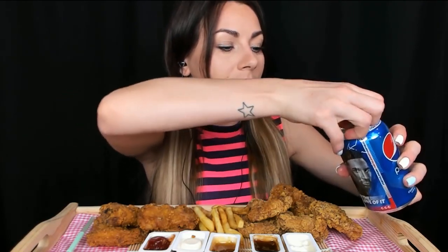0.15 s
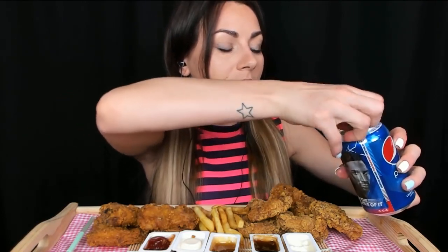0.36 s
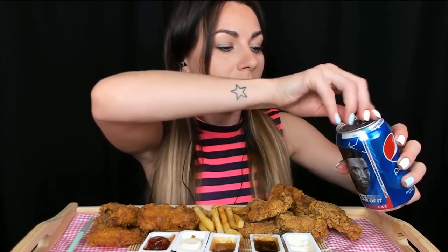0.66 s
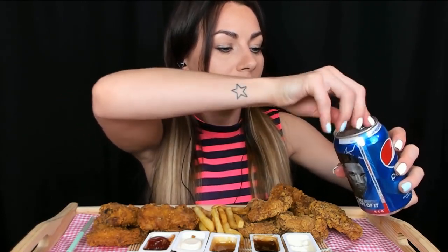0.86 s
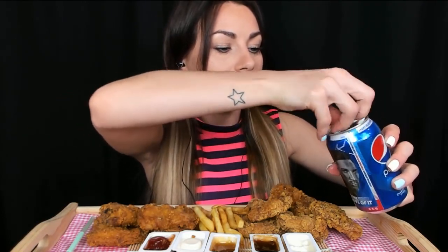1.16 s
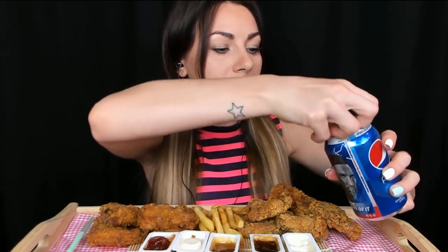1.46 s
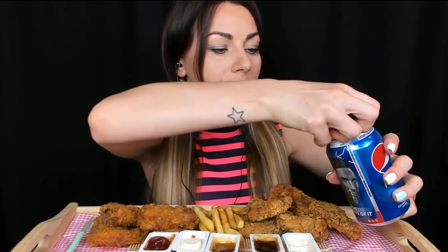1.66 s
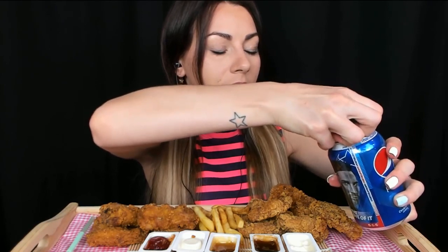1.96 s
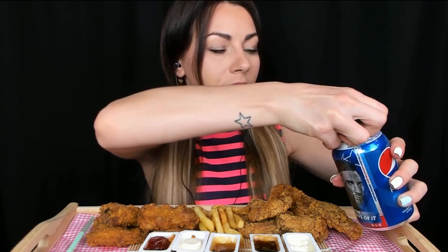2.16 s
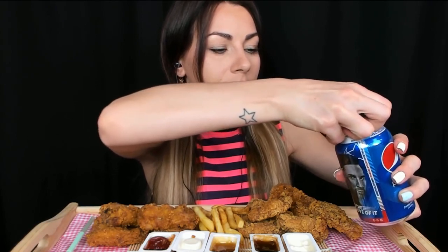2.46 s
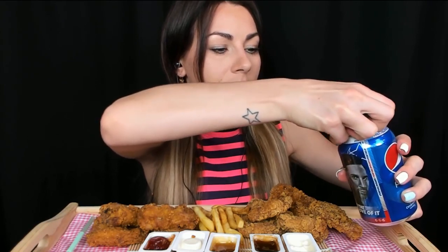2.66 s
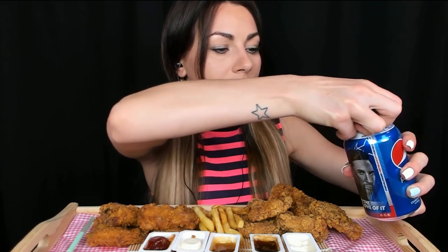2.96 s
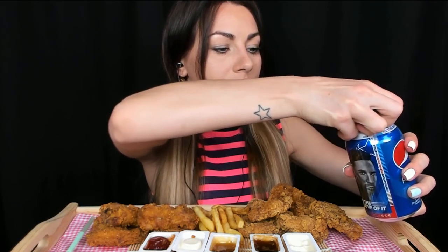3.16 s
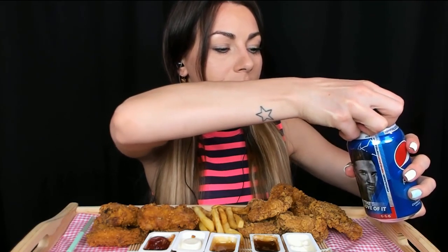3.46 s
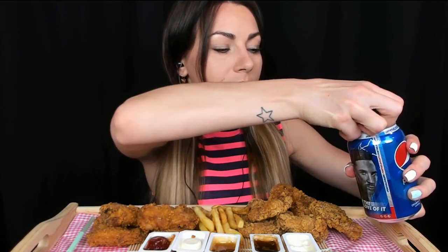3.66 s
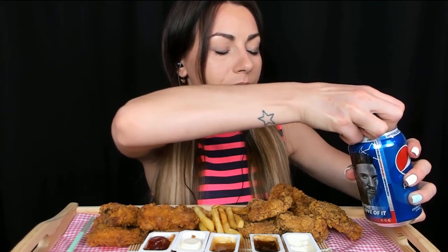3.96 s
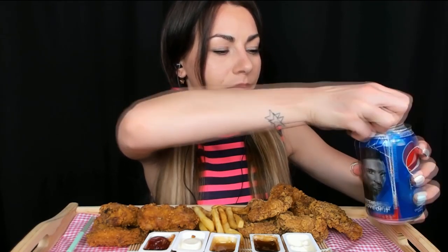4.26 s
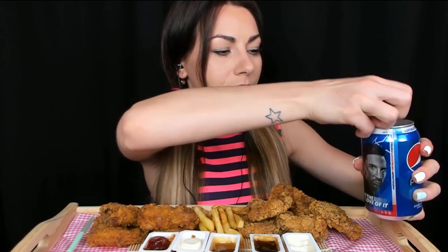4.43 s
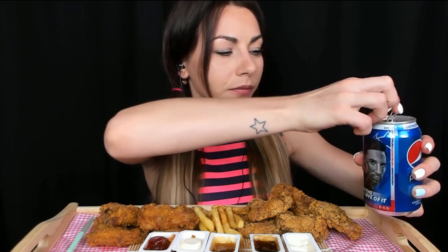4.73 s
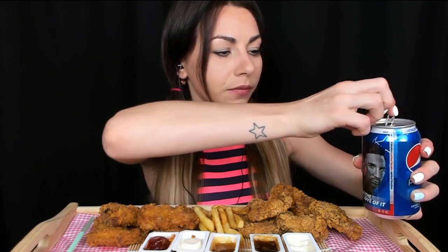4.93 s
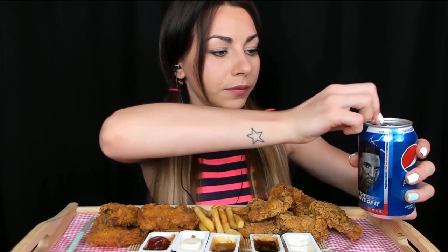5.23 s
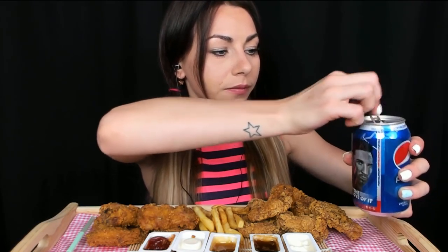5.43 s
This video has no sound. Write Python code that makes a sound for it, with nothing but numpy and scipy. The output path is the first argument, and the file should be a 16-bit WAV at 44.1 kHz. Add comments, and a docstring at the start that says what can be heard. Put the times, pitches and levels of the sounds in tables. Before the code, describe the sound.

A drink can is opened close to the microphones, slightly left of centre. Irregular nail clicks and scratches come first, then fine stick-slip creaks of the tab, then an abrupt crack and spray of escaping gas that dies fast. Near quiet follows, until a burst of crisp tearing snaps, delicate crackling bubbles and hollow tinny pops from the gripped can. Small, quiet room, little echo.

```python
"""Opening a soda can

A can is opened close to a stereo microphone in a quiet small room with a faint deep throb.
Nails tap and scrape the lid, the ring-pull creaks in stick-slip runs, the seal cracks and gas jets out.
Later the score line tears, the drink fizzes as clouds of tiny clicks and the thin wall pops.
Metal is struck noise plus decaying modes; gas is coloured noise shaped by its flow."""
import sys
import numpy as np
from scipy import signal
from scipy.fft import rfft, irfft, next_fast_len
from scipy.io import wavfile
from scipy.ndimage import uniform_filter1d

SR = 44100
rng = np.random.default_rng(int(sys.argv[2]) if len(sys.argv) > 2 else 0)


def inscribe(sig):
    """Save sig as 16-bit PCM at rate SR to the path in sys.argv[1].

    A 1-D sig is mono; a 2-D sig holds one channel per row.
    Samples are clipped to [-1, 1] before scaling.
    """
    pcm = np.round(np.clip(np.atleast_2d(sig).T, -1, 1) * 32767)
    wavfile.write(sys.argv[1], SR, pcm.astype(np.int16))


N = 246519
TIME = np.arange(N) / SR


def from_db(db):
    """Decibels to gain."""
    return 10 ** (np.asarray(db) / 20)


def rms_one(x):
    """Scale to unit power."""
    return x / np.sqrt(np.mean(x ** 2) + 1e-20)


def in_time(rows):
    """One curve per column, joined by straight lines."""
    s, *columns = np.transpose(rows)
    return [np.interp(TIME, s, c) for c in columns]


def at_hz(points, hz):
    """Read a table on a log-frequency axis."""
    known, values = np.transpose(points)
    return np.interp(np.log(np.maximum(hz, 1)), np.log(known), values)


def pan(left_db):
    """Channel gains for a source that is left_db louder on the left."""
    return from_db(np.array([[left_db], [-left_db]]) / 2)


def add(out, s, sound):
    """Mix a sound in at a time."""
    start = int(round(s * SR))
    out[:, start:start + sound.shape[1]] += sound[:, :N - start]


# even balance between the microphones: [f/Hz, left minus right/dB]
CENTRED = [(100, 0), (10000, 0)]


def coloured(pair, spectrum, likeness, sides=CENTRED):
    """Blend two unrelated signals into stereo of given spectrum, left-right likeness and balance; rms 1."""
    length = pair.shape[1]
    size = next_fast_len(length)
    hz = np.fft.rfftfreq(size, 1 / SR)
    left_right = np.array([[1], [-1]])
    mid, side = rfft(pair, size) * from_db(at_hz(spectrum, hz))
    alike = np.clip(at_hz(likeness, hz), -1, 1)
    both = np.sqrt(1 + alike) * mid + np.sqrt(1 - alike) * side * left_right
    balance = from_db(at_hz(sides, hz) * left_right / 2)
    return rms_one(irfft(both * balance, size)[:, :length])


# left-right likeness of the can's metal: [f/Hz, likeness 0-1]
CAN_LIKENESS = [(300, .7), (1800, 0.84), (4500, 0.22), (9000, 0.22), (16000, 0.252)]


def noise(spectrum, likeness=CAN_LIKENESS, size=N, sides=CENTRED):
    """Steady stereo noise; rms 1."""
    return coloured(rng.standard_normal((2, size)), spectrum, likeness, sides)


def flutter(per_s, depth_db):
    """A gain that wanders at random, per_s turns a second."""
    knots = rng.standard_normal(N)
    return from_db(depth_db * np.interp(TIME * per_s, np.arange(N), knots))


def grains(per_s, spread_db):
    """Two trains of random tiny clicks, most weak and a few strong."""
    strength = np.minimum(rng.exponential(1, (2, N)), 4)
    sizes = from_db(spread_db * strength) * rng.choice([-1, 1], (2, N))
    return sizes * (rng.random((2, N)) < per_s / SR)


def swells(rows, attack_s, release_s):
    """Gain that rises to each row's level, holds and falls; attack and release each span 60 dB."""
    levels = []
    for s, hold_s, level_db in rows:
        before = np.maximum(s - TIME, 0) / attack_s
        after = np.maximum(TIME - s - hold_s, 0) / release_s
        levels.append(level_db - 60 * (before + after))
    return from_db(np.maximum(np.max(levels, axis=0), -200))


def dying(s, level_db, t60):
    """A sudden start and an exponential fall."""
    return (TIME > s) * from_db(level_db - 60 * np.maximum(TIME - s, 0) / t60)


def ringing(modes, t, vary_db, port_spread):
    """Decaying modes; each blow and each microphone finds them with other strengths and phases."""
    hz, level_db, t60 = np.transpose(modes)[:, :, None]
    strength = from_db(level_db + vary_db * rng.standard_normal((2, len(modes), 1)))
    shared_phase = rng.uniform(0, 2 * np.pi, (len(modes), 1))
    phase = shared_phase + port_spread * rng.standard_normal((2, len(modes), 1))
    return np.sum(strength * from_db(-60 * t / t60) * np.sin(2 * np.pi * hz * t + phase), axis=1)


def blows(rows, modes, colour, crack_t60, ring_db, tail_db, tail_t60, rise_s):
    """Each blow is a short crack, the main modes, and a wash of the thin shell's countless small modes."""
    out = np.zeros((2, N))
    t = np.arange(SR // 5) / SR
    treble = signal.butter(1, 5000, "high", fs=SR, output="sos")
    for s, onset_db, treble_db in rows:
        decay = from_db(-60 * t / crack_t60) + from_db(tail_db - 60 * t / tail_t60)
        shell = noise(colour, size=len(t)) * decay
        ring = from_db(ring_db) * ringing(modes, t, vary_db=5.5, port_spread=0.452)
        blow = (shell + ring) * (1 - np.exp(-t / rise_s))
        blow = blow + (from_db(treble_db) - 1) * signal.sosfilt(treble, blow)
        onset_rms = np.sqrt(np.mean(blow[:, :SR // 400] ** 2))  # over the first 2.5 ms
        add(out, s, from_db(onset_db) * blow / onset_rms)
    return out


# balance of scraped metal between the microphones: [f/Hz, left minus right/dB]
LID_SIDES = [(500, 1.5), (2000, 2), (5000, 4.5), (10000, 3)]


def scraping(colour, modes, per_s, ring_db):
    """Dense little slips, heard directly and through the modes of the metal; rms 1."""
    slips = coloured(grains(per_s, spread_db=3.0), colour, CAN_LIKENESS, LID_SIDES)
    metal = ringing(modes, np.arange(SR // 10) / SR, vary_db=4.0, port_spread=0.47)
    rung = rms_one(signal.fftconvolve(slips, metal, axes=1)[:, :N])
    return rms_one(slips + from_db(ring_db) * rung)


def through_can(x, ring_db, t60):
    """Sound bounces about inside the can, whose many close air modes ripple the spectrum; rms 1."""
    t = np.arange(SR // 12) / SR
    bounces = rng.standard_normal((1, len(t))) * from_db(-60 * t / t60)
    bounces = rms_one(bounces) / np.sqrt(len(t))
    return rms_one(x + from_db(ring_db) * signal.fftconvolve(x, bounces, axes=1)[:, :N])


# room tone spectrum, shape only: [f/Hz, level/dB per Hz]
ROOM_TONE_COLOUR = [(12, -34.5), (20, -3.5), (70, -12), (123, -17.5), (216, -9.5), (255, -16.5), (319, -16),
                    (367, -17.5), (574, -22.5), (1760, -26.5), (2200, -28.5), (2820, -28), (4300, -37),
                    (14300, -43), (16000, -44.5)]
# left-right likeness of the room tone: [f/Hz, likeness 0-1]
TONE_LIKENESS = [(60, 0), (150, 0.7), (380, 0.25), (950, 0.5), (2380, 0.34), (5980, 0.34), (15000, 1)]
# trains of deep pulses: [first t/s, count, height before the low-pass]
THROBS = [(0.267, 10, -0.00327), (4.618, 3, 0.0029)]
ROOM_TONE_DB, THROB_PERIOD_S = -60, .4257


def background(throb_s, sag_s, sag):
    """Room tone, and an evenly paced deep throb of alternating sign; each pulse sags back to rest."""
    out = from_db(ROOM_TONE_DB) * noise(ROOM_TONE_COLOUR, TONE_LIKENESS)
    t = np.arange(SR // 2) / SR
    shape = np.where(t < throb_s, 1, sag * np.exp(-t / sag_s))
    pulse = signal.sosfilt(signal.butter(2, 45, fs=SR, output="sos"), shape)
    for s, count, height in THROBS:
        for k in range(round(count)):
            add(out, s + k * THROB_PERIOD_S, (-1) ** k * height * pulse[None])
    return out


# nail taps on the lid: [t/s, onset level/dB, treble lift/dB]
NAIL_TAPS = [(0.39, -48, 10), (0.3978, -67, 23), (0.405, -44.5, -6), (0.4914, -54, -3), (0.5357, -56, -17),
             (0.6779, -33, 5), (0.7087, -43, -8), (0.8024, -41, 6), (0.82, -51, -13), (0.8616, -40, -2),
             (0.9926, -57, -4), (1.0392, -51.5, -15), (1.1837, -57, -4)]
# tap spectrum, shape only: [f/Hz, level/dB per Hz]
TAP_COLOUR = [(530, -51.5), (900, -15), (1950, -6), (3860, -7.5), (5100, -5), (6800, -9.5), (8050, -7),
              (10200, -14), (12600, -15), (16000, -21)]
# modes of the lid, tight under pressure: [f/Hz, level/dB, t60/s]
TIGHT_LID = [(1426, -12.5, 0.049), (2026, 3, 0.037), (2560, -1, 0.04), (2872, -12.5, 0.066),
             (3010, -17, .04), (4253, -9.5, .035), (4874, -0.5, 0.025), (5150, -5.5, 0.0252),
             (5755, 1, 0.027), (7500, -16, .04), (7790, -11, .04), (8100, -8.5, 0.031), (8880, -11.5, .045),
             (9730, -11.5, .03), (12600, -10, .03)]
# nails sliding among the taps: [t/s, hold/s, level/dB]
NAIL_SLIDES = [(0.389, 0.012, -56), (0.42, 0.091, -65), (0.533, .01, -60), (0.693, 0.016, -52),
               (0.785, .04, -58.5), (0.993, 0.025, -60.5), (1.25, .025, -70.5)]
# slide spectrum, shape only: [f/Hz, level/dB per Hz]
SLIDE_COLOUR = [(900, -21), (1450, -8.5), (2050, -7), (2400, -14), (2900, -5), (3900, -7.5), (5000, -8),
                (6000, -3), (7000, -12), (8500, -8), (10500, -11.5), (13000, -12), (16000, -21)]
SLIDE_ATTACK_S, SLIDE_RELEASE_S = 0.089, 0.12


def nails():
    """Nails tap the tight lid as single blows and scrape over it as dense slips."""
    taps = blows(NAIL_TAPS, TIGHT_LID, TAP_COLOUR, crack_t60=0.024, ring_db=-1.0,
                 tail_db=-12.5, tail_t60=0.08, rise_s=0.00032)
    slide_gain = swells(NAIL_SLIDES, SLIDE_ATTACK_S, SLIDE_RELEASE_S)
    scrape = slide_gain * scraping(SLIDE_COLOUR, TIGHT_LID, per_s=2500, ring_db=-14)
    return taps * pan(left_db=4.0) + scrape


# hollow between fingers and lid, ringing as they move: [t/s, f/Hz, level/dB]
HOLLOW_GLIDE = [(0.75, 1836, -88), (0.785, 1820, -69), (0.81, 1850, -69), (0.83, 1907, -55),
                (0.86, 1990, -71), (0.89, 2030, -73), (0.92, 2030, -93)]
# modes of that hollow: [multiple of its pitch, level/dB]
HOLLOW_MODES = [(1, 4.5), (1.39, -10)]


def finger_hollow(width_hz):
    """Scraping excites two modes of the air under the fingers, whose pitch rises as they open."""
    hz, level_db = in_time(HOLLOW_GLIDE)
    phase = 2 * np.pi * np.cumsum(hz) / SR
    lowpass = signal.butter(2, width_hz, fs=SR, output="sos")
    out = 0
    for ratio, mode_db in HOLLOW_MODES:
        # slow noise on both quadratures makes a narrow band around the gliding pitch
        cos_gain, sin_gain = signal.sosfilt(lowpass, rng.standard_normal((2, N)))
        band = cos_gain * np.cos(ratio * phase) + sin_gain * np.sin(ratio * phase)
        out = out + from_db(mode_db) * rms_one(band)
    return from_db(level_db) * out * pan(left_db=3.0)


# pulls on the tab, each a run of slips:
# [t/s, slip count, gap/s, first onset level/dB, growth/dB per slip, treble lift/dB, rasp level/dB]
TAB_PULLS = [(1.49, 6, 0.0088, -59, 2, -1, -63), (1.549, 4, 0.0092, -43.5, -2.5, 8, -66),
             (1.6108, 2, 0.024, -49.5, 2, -5, -77), (1.655, 6, 0.011, -48.5, -1.34, 2, -58),
             (1.7141, 5, 0.013, -52.5, 0, 1, -61), (1.7874, 2, 0.018, -55, -3, -5, -64.5),
             (1.8302, 2, .0255, -50.5, -4, 3, -78), (1.869, 2, .0145, -57, 2, -1, -71),
             (1.935, 5, .0109, -57.5, 1.34, 4, -65), (2.034, 3, 0.039, -60, -0.5, -5, -69.5)]
SLIP_JITTER = .025  # unevenness of the slips, as a share of their gap


def stick_slip():
    """Under each pull the tab slips at a nearly even pace, harder, softer or alike each time."""
    slips = []
    for s, count, gap_s, onset_db, growth_db, treble_db, _ in TAB_PULLS:
        for k in range(round(count)):
            slip_s = s + gap_s * (k + SLIP_JITTER * rng.standard_normal())
            slips.append((slip_s, onset_db + growth_db * k, treble_db))
    return slips


# modes of the ring-pull levering on its rivet: [f/Hz, level/dB, t60/s]
RING_PULL_MODES = [(1430, -5.5, 0.056), (1730, -7.5, .04), (2050, -6, .04), (2860, -1, 0.04),
                   (5100, -9.5, .009), (8400, 1.5, 0.011), (12050, -10, .008)]
# creak spectrum, shape only: [f/Hz, level/dB per Hz]
CREAK_COLOUR = [(650, -44.5), (1100, -12.5), (2060, -9), (2700, -7), (2920, -6.5), (3860, -16.5),
                (4940, -11), (6980, -15), (11800, -13), (16000, -26)]
RASP_ATTACK_S, RASP_RELEASE_S = .08, 0.11


def ring_pull():
    """The tab creaks in stick-slip and rasps on its rivet all through each pull."""
    creaks = blows(stick_slip(), RING_PULL_MODES, CREAK_COLOUR, crack_t60=0.011, ring_db=-11.5,
                   tail_db=-16.5, tail_t60=0.056, rise_s=.0001)
    pulls = [(s, count * gap_s, rasp_db) for s, count, gap_s, _, _, _, rasp_db in TAB_PULLS]
    rasp_gain = swells(pulls, RASP_ATTACK_S, RASP_RELEASE_S)
    rasp = rasp_gain * scraping(CREAK_COLOUR, RING_PULL_MODES, per_s=500, ring_db=-2)
    return creaks * pan(left_db=3.5) + rasp


# the seal cracking under pressure: [t/s, onset level/dB, treble lift/dB]
SEAL_CRACKS = [(2.1565, -26.5, 2.5), (2.1602, -8.5, -2)]
# seal spectrum, shape only: [f/Hz, level/dB per Hz]
SEAL_COLOUR = [(88, -47), (150, -15), (854, -13.5), (2310, -6), (4580, 0.5), (7180, -10.5), (8230, -5),
               (10200, -13), (11700, 0), (16000, -19)]


def seal_crack():
    """The seal gives way in two sharp blows that ring the tight lid."""
    return blows(SEAL_CRACKS, TIGHT_LID, SEAL_COLOUR, crack_t60=0.014, ring_db=-19,
                 tail_db=-25.5, tail_t60=.05, rise_s=0.00035)


# gas spurts as the slit opens and widens: [t/s, level/dB, attack/s, hold/s, t60 of sagging pressure/s]
SPURTS = [(2.158, -5.5, .008, 0.1266, 0.82), (2.29, -13.5, 0.0038, 0.079, 0.314)]
SPURT_RELEASE_S = 0.14  # t60 added once the pressure is spent


def gas_flow():
    """Each spurt opens quickly, sags with the pressure and dies away once that is spent."""
    flow = 0
    for s, level_db, attack_s, hold_s, sag_t60 in SPURTS:
        t = np.clip(TIME - s, 0, 1)
        fall = t / sag_t60 + np.maximum(t - hold_s, 0) / SPURT_RELEASE_S
        flow = flow + (1 - np.exp(-t / attack_s)) * from_db(level_db - 60 * fall)
    return flow


# spectra of jet, rush inside the can and low buffeting, shape only: [f/Hz, level/dB per Hz]
JET_COLOUR = [(6000, -38.5), (7200, -19), (7800, -3), (8400, 3), (9000, -3.5), (9900, -5.5), (11000, -2.5),
              (11900, -0.5), (12400, -3), (13100, -3.5), (13900, -8.5), (14700, -5.5), (16000, -13.5)]
RUSH_COLOUR = [(300, -22), (900, -12.5), (1400, -10), (1750, -9), (2100, -5.5), (2600, -4.5), (2950, -4),
               (3500, -2.5), (4400, -0.5), (5200, -1), (6300, -3), (6800, -8.5), (7400, -0.5),
               (9000, -26.5)]
BUFFET_COLOUR = [(20, -6), (45, 1.5), (90, -5), (200, -3.5), (500, -5), (1100, -10), (2000, -14.5),
                 (4000, -41.5)]
# left-right likeness of the escaping gas: [f/Hz, likeness 0-1]
GAS_LIKENESS = [(300, 0.3), (1800, 0.6), (3000, 0.6), (5000, 0.24), (8500, 0.5), (13000, 0.11)]
# balance of the gas between the microphones: [f/Hz, left minus right/dB]
GAS_SIDES = [(60, 3.75), (110, 4.9), (200, 5.5), (380, 5.3), (700, 6.9), (1290, 5.0), (2380, 1.0),
             (4400, 1.5), (8120, 6.4), (15000, 2.5)]
# the first of the gas blows over the microphones: [t/s, hold/s, level/dB]
GUST = [(2.161, .097, -37)]
RUSH_DB, RUSH_FOLLOWS = -11, 1.28  # level at unit flow, dB per dB of flow
BUFFET_DB = -45  # against the flow


def gas():
    """A sputtering bright jet leaves the slit, with a duller rush and buffeting beneath it."""
    flow = gas_flow()
    jet_noise = noise(JET_COLOUR, GAS_LIKENESS, sides=GAS_SIDES)
    jet = flow * through_can(jet_noise, ring_db=-7.0, t60=0.078)
    rush_noise = noise(RUSH_COLOUR, GAS_LIKENESS, sides=GAS_SIDES)
    rush_gain = from_db(RUSH_DB) * flow ** RUSH_FOLLOWS
    rush = rush_gain * through_can(rush_noise, ring_db=-2.5, t60=0.073)
    buffet_gain = from_db(BUFFET_DB) * flow + swells(GUST, attack_s=0.0066, release_s=0.033)
    buffet = buffet_gain * noise(BUFFET_COLOUR, GAS_LIKENESS, sides=GAS_SIDES)
    return flutter(per_s=330, depth_db=0.8) * (jet + rush + buffet)


# left-right likeness of the soft tails and the fizz: [f/Hz, likeness 0-1]
FIZZ_LIKENESS = [(60, 0.23), (150, 0.6), (380, 0.4), (950, 0.6), (2380, 0.7), (5980, 0.24), (15000, 0.73)]
# the hiss lingering in the room after the burst: [t/s, level/dB, t60/s]
HISS_TAIL = (2.34, -36.5, 0.5)
# a soft noise tail that starts abruptly after the tears and dies away: [t/s, level/dB, t60/s]
TEAR_TAIL = (4.198, -43.5, 0.46)
# their spectra, shape only: [f/Hz, level/dB per Hz]
HISS_TAIL_COLOUR = [(1470, -15.5), (2500, -7.5), (4110, -11), (4480, -3.5), (6110, -9), (8400, -1),
                    (13200, -12), (16000, -23)]
TEAR_TAIL_COLOUR = [(180, -50), (300, -26), (515, -9.5), (746, -20), (937, -7), (1010, -24), (1100, -11.5),
                    (2360, -5.5), (2920, 1), (9000, -27.5), (11700, -52), (19800, -120)]


def soft_tails():
    """Fading noise: the hiss lingers in the room after the burst, and a soft tail follows the tears."""
    hiss_tail = dying(*HISS_TAIL) * noise(HISS_TAIL_COLOUR, FIZZ_LIKENESS)
    tear_tail = dying(*TEAR_TAIL) * noise(TEAR_TAIL_COLOUR, FIZZ_LIKENESS) * pan(left_db=-0.5)
    return (hiss_tail + tear_tail) * flutter(per_s=250, depth_db=-0.8)


# the score line giving way: [t/s, onset level/dB, treble lift/dB]
TEARS = [(3.988, -61, -11.5), (4.0313, -26.5, 8), (4.0347, -25, 18), (4.0360, -24, 9.5),
         (4.0675, -27.5, -2), (4.0750, -27, 15), (4.1110, -29, 13), (4.1915, -50.5, -13)]
# modes of the lid, slack after venting: [f/Hz, level/dB, t60/s]
SLACK_LID = [(2530, 7, 0.018), (2810, -3, 0.017), (3240, -2.5, .018), (3720, 0, 0.024), (3850, -13, 0.083),
             (4570, -9, 0.028), (4945, -14, 0.23), (5130, -23, 0.2), (5350, -6, 0.057), (7160, -11, .03),
             (9030, -1, 0.011)]
# tear spectrum, shape only: [f/Hz, level/dB per Hz]
TEAR_COLOUR = [(180, -55), (300, -21), (713, -9.5), (1870, -11.5), (2480, -1), (3640, 1), (4300, -7),
               (5250, -5.5), (7820, -12), (9240, -6), (12100, -22), (14000, -15), (16000, -34)]


def score_tear():
    """The score line tears in jerks, each a blow on the slack lid."""
    tears = blows(TEARS, SLACK_LID, TEAR_COLOUR, crack_t60=0.0073, ring_db=-21.5,
                  tail_db=-27, tail_t60=0.14, rise_s=0.00087)
    return tears * pan(left_db=4.0)


# spectra of spray at the opening and bubbles inside, shape only: [f/Hz, level/dB per Hz]
SPRAY_COLOUR = [(1500, -29.5), (2500, -9), (3200, -0.5), (3600, -7), (4100, -1), (5600, -4.5), (7000, -5),
                (8600, 0.5), (10300, -6), (13200, -6.5), (14900, -6.5), (16000, -17.5)]
BUBBLE_COLOUR = [(350, -27), (500, -4.5), (700, -15), (950, 2.5), (1400, -10), (1900, -6), (2550, 2.5),
                 (3200, 0.5), (3600, -7), (4100, -1), (6200, -7), (7300, -16), (8650, -9), (16000, -32)]
# balance of the fizz between the microphones: [f/Hz, left minus right/dB]
FIZZ_SIDES = [(60, -0.5), (130, 1), (290, 9), (640, 8), (1410, 1), (3100, 1), (6820, 5.5), (15000, 5)]
# spray builds, then slowly settles: [t/s, hold/s, level/dB]
SPRAY_SWELL = [(4.52, 0.085, -57)]
# foam wells up inside the can as it is moved: [t/s, hold/s, level/dB before its flutter]
FOAM_SWELLS = [(4.33, .03, -61.5), (4.8, 0.099, -59), (5.02, 0.12, -59.5), (5.3, .28, -57.5)]
FIZZ_START_S = 4.195  # where the fizz starts
SPRAY_ATTACK_S, SPRAY_RELEASE_S = 5.5, 7.1
FOAM_ATTACK_S, FOAM_RELEASE_S = 1, 0.96


def fizz():
    """Thousands of bubbles burst, some at the opening, some heard through the air in the can."""
    spray = coloured(grains(per_s=4500, spread_db=2.5), SPRAY_COLOUR, FIZZ_LIKENESS, FIZZ_SIDES)
    inside = coloured(grains(per_s=1800, spread_db=3.0), BUBBLE_COLOUR, FIZZ_LIKENESS, FIZZ_SIDES)
    inside = through_can(inside, ring_db=-4, t60=0.039) * flutter(per_s=20, depth_db=1.4)
    spray = swells(SPRAY_SWELL, SPRAY_ATTACK_S, SPRAY_RELEASE_S) * spray
    foam = swells(FOAM_SWELLS, FOAM_ATTACK_S, FOAM_RELEASE_S) * inside
    return (TIME > FIZZ_START_S) * (spray + foam)


# the thin wall popping under the grip: [t/s, level/dB, f/Hz, t60/s, metallic tick level/dB]
WALL_POPS = [(4.3602, -36, 715, 0.0088, -45.5), (4.3628, -48, 512, 0.033, -72),
             (4.385, -51, 2510, .015, -51), (4.439, -49.5, 710, 0.017, -74),
             (4.450, -56.5, 538, 0.061, -72), (4.568, -56, 824, 0.026, -66),
             (4.9917, -34, 960, 0.013, -42.5), (5.018, -47.5, 1000, 0.024, -74),
             (5.394, -30.5, 986, 0.0071, -47), (5.3953, -51, 553, 0.051, -66)]
GRIP_T60_S = .025  # the gripping hand stops the metal from ringing longer


def wall_pops(rise_s):
    """A dent flips: a metallic tick and a few hand-damped cycles."""
    ticks = [(s, tick_db, 0) for s, _, _, _, tick_db in WALL_POPS]
    gripped = [(hz, level_db, min(t60, GRIP_T60_S)) for hz, level_db, t60 in SLACK_LID]
    out = blows(ticks, gripped, TEAR_COLOUR, crack_t60=0.0039, ring_db=-22,
                tail_db=-25, tail_t60=.05, rise_s=0.00036)
    t = np.arange(SR // 5) / SR
    for s, level_db, hz, t60, _ in WALL_POPS:
        swing = (1 - np.exp(-t / rise_s)) ** 2 * from_db(-60 * t / t60)
        cycles = swing / swing.max() * np.sin(2 * np.pi * hz * t)
        add(out, s, from_db(level_db) * cycles[None])
    return out * pan(left_db=7.5)


# the left microphone hears the can a little earlier: [f/Hz, phase lag of the right/rad]
PORT_PHASE = [(300, .05), (2000, 0.21), (4500, 0.68), (7000, 0.493), (9500, .15)]


def ports(x):
    """Turn the right channel late against the left."""
    size = next_fast_len(N)
    lag = at_hz(PORT_PHASE, np.fft.rfftfreq(size, 1 / SR))
    turn = np.exp(-1j * lag * [[0], [1]])
    return irfft(rfft(x, size) * turn, size)[:, :N]


# room decay: [f/Hz, t60/s]
ROOM_T60 = [(200, 0.585), (1000, 0.39), (3000, .45), (6000, 0.48), (11000, 0.27)]


def room(x, first_echo_s):
    """Diffuse reflections, own in each channel, dying at their own rate in each octave."""
    t = np.arange(SR * 3 // 4) / SR
    edges = np.geomspace(125, 16000, 8)
    echoes = 0
    for low, high in zip(edges, edges[1:]):
        octave = signal.butter(2, [low, high], "band", fs=SR, output="sos")
        band = signal.sosfilt(octave, rng.standard_normal((2, len(t))))
        decay = from_db(-60 * t / at_hz(ROOM_T60, np.sqrt(low * high)))
        echoes = echoes + band * decay * (t > first_echo_s)
    echoes = rms_one(echoes) / np.sqrt(len(t))
    mono = x.sum(axis=0, keepdims=True) / np.sqrt(2)
    return signal.fftconvolve(mono, echoes, axes=1)[:, :N]


def scene():
    """The can close up, in its room."""
    handling = ports(nails() + finger_hollow(width_hz=17) + ring_pull() + score_tear() + fizz())
    venting = ports(seal_crack() + gas())
    pops = wall_pops(rise_s=0.0008)
    to_room = from_db(-16.0) * handling + from_db(-22) * venting + from_db(-11.0) * pops
    reflected = room(to_room, first_echo_s=0.0032)
    quiet = background(throb_s=0.0316, sag_s=0.22, sag=.4)
    return handling + venting + soft_tails() + pops + reflected + quiet


# brief dips in level round the two loud moments: [from t/s, to t/s, level/dB]
LEVEL_DIPS = [(2.127, 2.462, -13), (3.999, 4.191, -14)]
CUTOFF_HZ = 15800


def record(dry):
    """The level dips twice, the highest peaks are rounded and the top is cut."""
    gain_db = sum(depth_db * ((TIME > start) & (TIME < end)) for start, end, depth_db in LEVEL_DIPS)
    dipped = dry * from_db(uniform_filter1d(gain_db * 1.0, size=128))  # edges eased over 128 samples
    ceiling = 0.47
    rounded = ceiling * np.tanh(dipped / ceiling)
    return signal.sosfilt(signal.ellip(12, .1, 80, CUTOFF_HZ, fs=SR, output="sos"), rounded)


dry = scene()
out = record(dry)
inscribe(out)
```